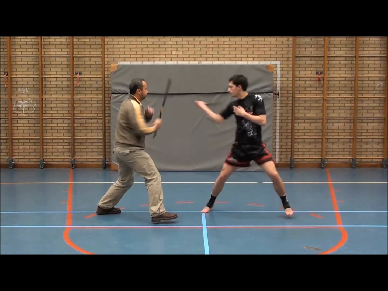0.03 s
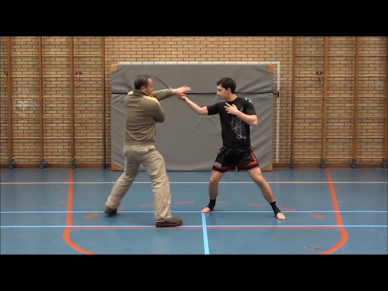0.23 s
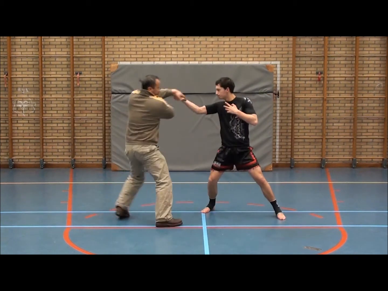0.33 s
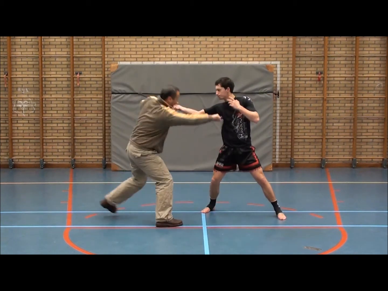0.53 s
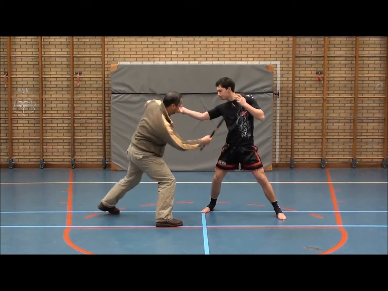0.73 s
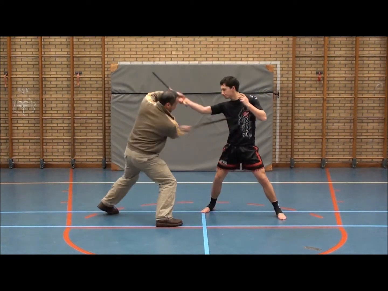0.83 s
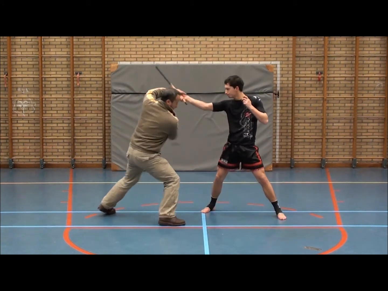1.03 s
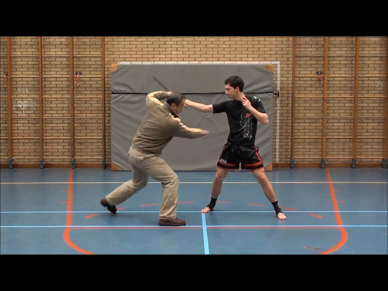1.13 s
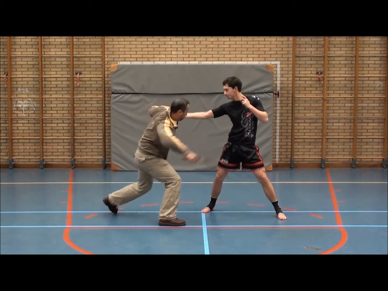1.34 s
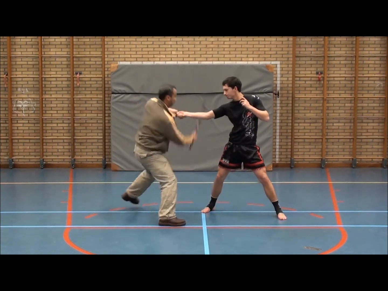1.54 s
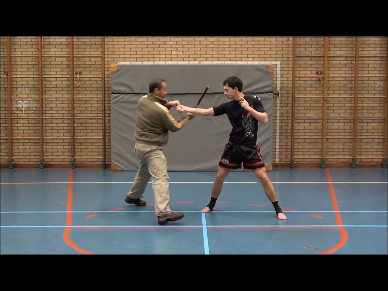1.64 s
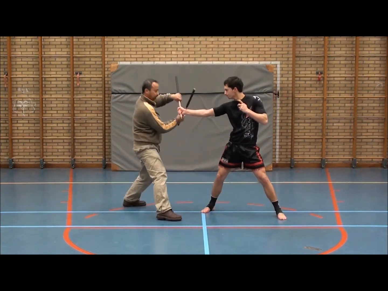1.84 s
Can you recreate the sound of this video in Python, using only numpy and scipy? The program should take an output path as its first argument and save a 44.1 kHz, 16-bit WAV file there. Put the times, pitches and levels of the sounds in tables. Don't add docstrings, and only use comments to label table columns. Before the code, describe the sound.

One bright, loud crack of two rattan sticks colliding near the start, echoing long in a large brick hall, then three much quieter flat slaps on arm, shoulder and ribs, with footfalls and rustling clothes, heard from a distance.

```python
import sys
import numpy as np
from scipy import signal
from scipy.fft import rfft, irfft
from scipy.io import wavfile
from scipy.ndimage import uniform_filter1d, minimum_filter1d, map_coordinates

SR = 44100
rng = np.random.default_rng(int(sys.argv[2]) if len(sys.argv) > 2 else 0)


def convert_level_to_amplitude(level_db):
    exponent = np.asarray(level_db, float) / 20
    return 10 ** exponent


def materialize(psi):
    bounded = np.clip(np.atleast_2d(psi).T, -1, 1)
    quanta = np.round(bounded * 32767).astype(np.int16)
    wavfile.write(sys.argv[1], SR, quanta)


N = 83790
T = np.arange(N) / SR

CRACK_S = 0.2308
HARD_CONTACT_S = 0.00065

# delay_s, level_db
BLOW_WALLS = [(.0075, -11), (.0125, -11), (.0185, -8), (.0228, -6), (.029, -11), (.036, -11)]
# frequency_hz, density_db (per Hz)
CLOTH = [(470, -28), (800, 0), (1210, 4), (1400, 3), (1740, -19), (2050, 2.5), (7740, 0.5), (11000, -43),
         (14300, -61), (22000, -120)]


def unit(x):
    return x / np.sqrt(np.mean(x ** 2) + 1e-20)


def along(points, hz):
    f, v = np.transpose(points)
    return np.interp(np.log(hz + 1), np.log(f + 1), v)


def coloured(x, db_of):
    hz = np.fft.rfftfreq(4096, 1 / SR)
    cepstrum = irfft(np.log(convert_level_to_amplitude(db_of(hz)) + 1e-6))
    cepstrum[1:2048] *= 2
    cepstrum[2049:] = 0
    response = irfft(np.exp(rfft(cepstrum)))
    return signal.fftconvolve(x, response)[:len(x)]


def noise(spectrum):
    return unit(coloured(rng.standard_normal(N), lambda hz: along(spectrum, hz)))


def wobble(rate):
    knots = rng.standard_normal(int(N * rate / SR) + 4)
    return map_coordinates(knots, [T * rate])


def modes(table, hz):
    return sum(db / (1 + ((hz - mode_hz) / width) ** 2 * 4) for mode_hz, width, db in table)


def rasp(shape):
    x = rng.standard_normal(len(shape)) * shape
    for _ in range(3):
        z = rfft(x)
        flat = irfft(z / np.abs(z))
        x = np.sign(flat) * np.sqrt(np.abs(x * flat))
    return x / np.linalg.norm(x)


def burst(s, contact_s, db_of, walls):
    split_hz = 280
    ring_s, linger_s, linger_db = 0.008, 0.13, -16.5
    bounce_s, bounce_db = 0.0015, 0
    near_tilt_db, far_tilt_db = 0, 0.8

    t = np.arange(4096) / SR
    low = lambda hz: db_of(hz) - 10 * np.log10(1 + (hz / split_hz) ** 4)
    high = lambda hz: db_of(hz) - 10 * np.log10(1 + (split_hz / (hz + 1)) ** 4)
    shape = convert_level_to_amplitude(-60 * np.maximum(t - contact_s, 0) / ring_s) + convert_level_to_amplitude(linger_db - 60 * t / linger_s)
    impulse = 1. * (t == 0)
    click = coloured(impulse, db_of)
    push = coloured(impulse, low)

    out = np.zeros((2, N + SR))
    out[0, round(s * SR):][:len(t)] = click
    for k, (delay, db) in enumerate([(0, 0), (bounce_s, bounce_db)] + walls):
        tilt_db = near_tilt_db if k < 2 else far_tilt_db
        tilted = lambda hz: high(hz) + tilt_db * np.log2(hz / 3000 + 0.21)
        arrival = coloured(rasp(shape), tilted) + (-1) ** k * push
        out[1, round((s + delay) * SR):][:len(t)] += convert_level_to_amplitude(db) * arrival
    return out[:, :N] / np.linalg.norm(click) * np.sqrt(.004 * SR)


def hall(x):
    # frequency_hz, t60_s
    decay = [(80, 0.88), (250, 1), (600, 1.25), (1500, 1.24), (4000, 1.03), (8000, 0.65), (14000, 0.47)]
    start_s, build_s = 0.014, 0.011
    clump_db = 2

    hz, t, z = signal.stft(rng.standard_normal((2, 2 * SR)), SR, nperseg=256)
    z = z * convert_level_to_amplitude(-60 * t / along(decay, hz)[:, None]) * np.clip((t - start_s) / build_s, 0, 1)
    clumps = uniform_filter1d(rng.standard_normal(z.shape[1:]), size=4, axis=0)
    clumps = uniform_filter1d(clumps, size=3, axis=1)
    z = z * convert_level_to_amplitude(clump_db * unit(clumps))
    tail = signal.istft(z, SR, nperseg=256)[1]
    return signal.fftconvolve(x[None], tail / np.linalg.norm(tail[0]), axes=1)[:, :N]


def placed(parts, wet_db):
    return parts[1] * [[1], [.3]] + convert_level_to_amplitude(wet_db) * hall(parts[0])


def background():
    # time_s, level_db
    effort = [(0.0, -39.5), (0.078, -43.5), (0.264, -38), (0.396, -41), (0.454, -51), (0.576, -39),
              (1.116, -44), (1.296, -49.5), (1.46, -51), (1.714, -43.5), (1.9, -39)]
    # frequency_hz, density_db (per Hz)
    air_spectrum = [(12, -49), (20, 0), (135, -11), (202, -3), (519, -3.5), (873, -10), (980, -10.5),
                    (2000, -8), (2600, -64), (4400, -120)]
    # frequency_hz, density_db (per Hz)
    hiss_spectrum = [(300, -5), (3000, -16), (9000, 5), (12000, -0.5), (15800, -2)]
    cloth_db, air_db, hiss_db = -2.5, -47, -49.5
    hiss_after_crack_db = -2.5
    whine_hz, whine_db = 14998, -74

    cloth_level_db = np.interp(T, *np.transpose(effort)) + cloth_db
    cloth = [noise(CLOTH) * convert_level_to_amplitude(cloth_level_db + 0.5 * wobble(25.65) + 1.84 * wobble(300))
             for _ in range(2)]
    air = [noise(air_spectrum) * convert_level_to_amplitude(air_db + 1.5 * wobble(8)) for _ in range(2)]
    hiss_level_db = hiss_db + hiss_after_crack_db * (T > CRACK_S)
    hiss = [noise(hiss_spectrum) * convert_level_to_amplitude(hiss_level_db) for _ in range(2)]
    whine = np.sqrt(2) * convert_level_to_amplitude(whine_db) * np.sin(2 * np.pi * whine_hz * T)
    return np.array(cloth) + air + hiss + whine * [[1], [0]]


def scuffs():
    # start_s, level_db
    ticks = [
        (0.03, -42),
        (.1227, -44.5),
        (.15, -39),
        (1.737, -64),
        (1.815, -49),
        (1.835, -46),
    ]
    out = 0
    for s, db in ticks:
        out = out + convert_level_to_amplitude(db) * burst(s, HARD_CONTACT_S, lambda hz: along(CLOTH, hz), BLOW_WALLS[2:])
    return placed(out, -4)


def swings():
    # start_s, length_s, level_db, first_hz, last_hz
    strokes = [
        (0.112, 0.14, -36, 224.3, 193.8),
        (0.123, 0.13, -40.5, 88.8, 60),
        (0.961, 0.103, -43, 260, 328.3),
        (1.15, 0.079, -45.5, 399.4, 336.4),
        (1.756, 0.072, -43, 288.6, 309),
        (1.819, .16, -42.5, 352.3, 519.4),
        (1.839, 0.139, -43, 546, 760),
        (1.812, 0.2, -47, 110.3, 170),
    ]
    out = np.zeros(N)
    for s, length, db, first_hz, last_hz in strokes:
        u = np.clip((T - s) / length, 0, 1)
        phase = 2 * np.pi * np.cumsum(first_hz + (last_hz - first_hz) * u) / SR
        rate = .55 * last_hz
        rough = (0.59 + wobble(rate)) * np.sin(phase) + wobble(rate) * np.cos(phase)
        out += convert_level_to_amplitude(db) * unit(rough) * np.sin(np.pi * u ** .5) ** 0.57
    return out * [[1], [.3]] + convert_level_to_amplitude(-19) * hall(out)


def steps():
    # start_s, level_db, pitch_hz
    footfalls = [
        (0.12, -31, 257),
        (0.404, -39, 211),
        (0.744, -36, 250),
        (0.814, -40.5, 265),
        (1.019, -45.5, 300),
        (1.175, -43, 392),
        (1.721, -36.5, 245),
    ]
    # frequency_hz, level_db
    board = [(30, -17), (60, 5), (150, 7.5), (300, -4), (600, -10.5), (3000, -1), (9000, 6), (15000, -45)]
    out = 0
    for s, db, pitch_hz in footfalls:
        octaves = lambda hz: np.log2((hz + 1) / pitch_hz)
        colour = lambda hz: along(board, hz) - 12 * np.log10(1 + (1.84 * octaves(hz)) ** 2)
        out = out + convert_level_to_amplitude(db) * burst(s, 0.0012, colour, BLOW_WALLS[2:])
    return placed(out, 6)


def crack():
    # frequency_hz, density_db (per Hz)
    impact = [(180, -56), (300, -21), (497, -12), (905, -17), (1090, -9), (1650, -3.5), (4180, -1),
              (7600, -9), (13000, -38.5)]
    # delay_s, level_db
    crack_walls = [(0.0107, 4.5), (0.0187, -2), (0.0242, -13), (0.0275, -9), (0.029, -5), (0.0387, -2)]
    # mode_hz, width_hz, lift_db
    rattan = [(1610, 150, 4.5), (2174, 340, 4), (2987, 140, 8), (4250, 450, 5.5), (5810, 370, 4.5),
              (7700, 1200, 4.5)]
    colour = lambda hz: along(impact, hz) + modes(rattan, hz)
    return convert_level_to_amplitude(-8.5) * placed(burst(CRACK_S, HARD_CONTACT_S, colour, crack_walls), 16)


def blows():
    # start_s, level_db, hall_db, contact_s, ring_share (0-1)
    hits = [
        (0.6272, -23, -3.5, 0.0012, 0.7),
        (0.9389, -23, -3, 0.0016, 0.55),
        (1.298, -21.5, -2, 0.0038, 0.95),
    ]
    # frequency_hz, density_db (per Hz)
    arm = [(60, -25), (130, -0.5), (300, -9.5), (1000, -9), (4000, -12), (6500, -4.5), (9000, -6.5),
           (12000, -30.5), (15800, -37)]
    shoulder = [(35, -47), (100, -3.5), (290, 4), (600, -8), (2200, -4), (5700, -3.5), (8500, -6),
                (11000, -21.5), (15800, -26)]
    ribs = [(35, -36), (70, -12.5), (200, -4), (550, -10), (1100, -11.5), (3900, -17.5), (8500, -17.5),
            (11000, -30.5), (15800, -40)]
    # mode_hz, width_hz, lift_db
    damped_stick = [(1673, 240, 4), (4670, 640, 2.5), (7330, 480, 4)]
    out = 0
    for (s, db, hall_db, contact_s, ring), body in zip(hits, (arm, shoulder, ribs)):
        colour = lambda hz: along(body, hz) + ring * modes(damped_stick, hz)
        out = out + convert_level_to_amplitude(db) * placed(burst(s, contact_s, colour, BLOW_WALLS), 7 + hall_db)
    return out


def scene():
    # frequency_hz, side_over_mid_db
    width = [(60, -29), (110, -31), (200, -23.5), (380, -16.5), (700, -11), (1290, -12.5), (2380, -12.5),
             (4400, -12), (8120, -12), (15000, -41)]
    lean_db = 0.12
    mid, side = background() + scuffs() + swings() + steps() + crack() + blows()
    side = coloured(side, lambda hz: along(width, hz))
    return np.array([mid + side, mid - side]) * convert_level_to_amplitude([[lean_db], [-lean_db]])


def roll_off(x):
    return signal.sosfilt(signal.butter(12, 16240, fs=SR, output="sos"), x)


def record(dry):
    ceiling_db, recover_db_per_s = -6.5, 48
    ahead_s, early_db = .026, -5
    top_hz = 15750

    power = uniform_filter1d(np.mean(dry ** 2, 0), size=161)
    level_db = 10 * np.log10(np.abs(power) + 1e-12)
    need_db = np.minimum(ceiling_db - level_db, 0)
    recovery_db = recover_db_per_s * T
    gain_db = recovery_db + np.minimum.accumulate(need_db - recovery_db)
    ahead = round(ahead_s * SR)
    near_peak = minimum_filter1d(gain_db, 2 * ahead + 1) < -1
    gain_db = np.minimum(gain_db, early_db * near_peak)
    x = dry * convert_level_to_amplitude(uniform_filter1d(gain_db, size=45))

    peak_gain = np.minimum(1, .97 / (np.abs(x).max(0) + 1e-9))
    peak_gain = minimum_filter1d(peak_gain, size=91)
    x = x * uniform_filter1d(peak_gain, size=45)
    x = irfft(rfft(x) * (np.fft.rfftfreq(N, 1 / SR) < top_hz), N)
    return roll_off(np.clip(x, -1, 1))


dry = scene()
out = record(dry)
materialize(out)
```